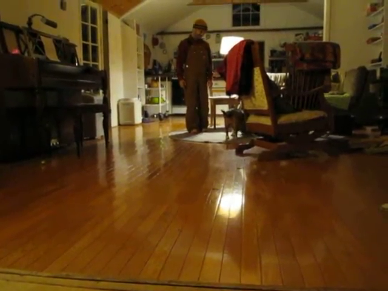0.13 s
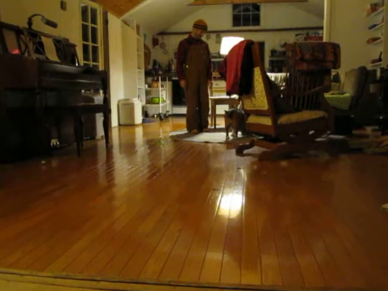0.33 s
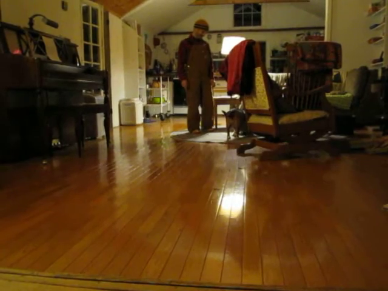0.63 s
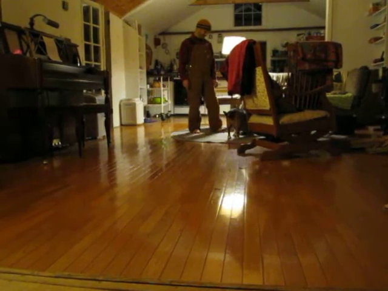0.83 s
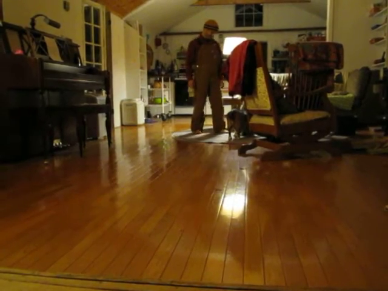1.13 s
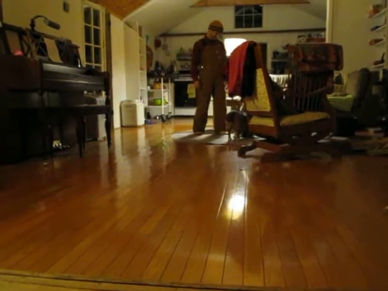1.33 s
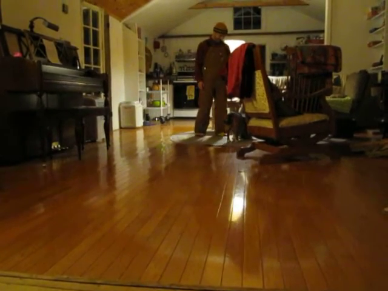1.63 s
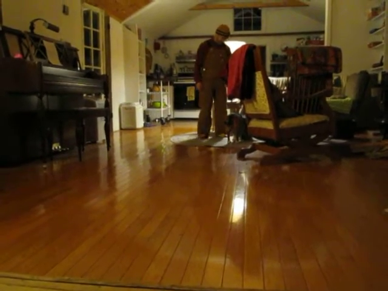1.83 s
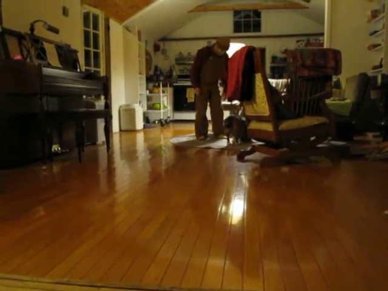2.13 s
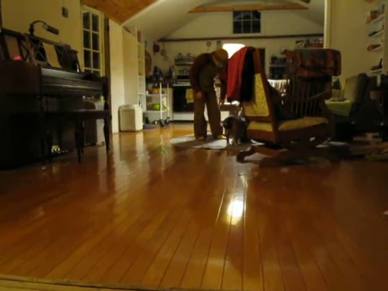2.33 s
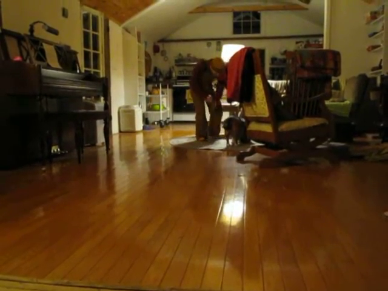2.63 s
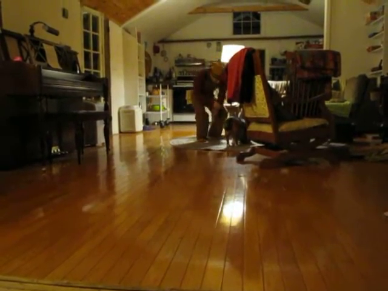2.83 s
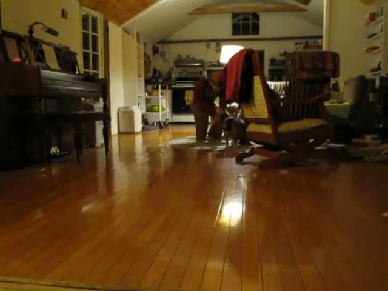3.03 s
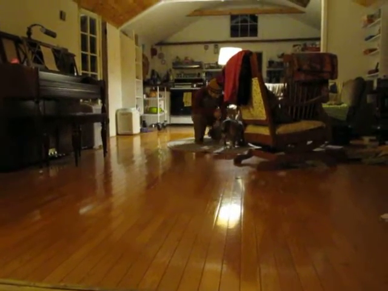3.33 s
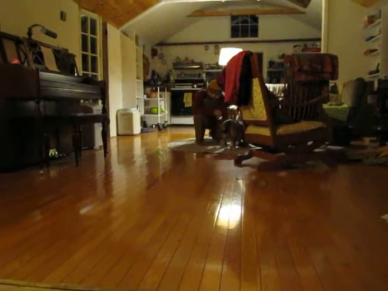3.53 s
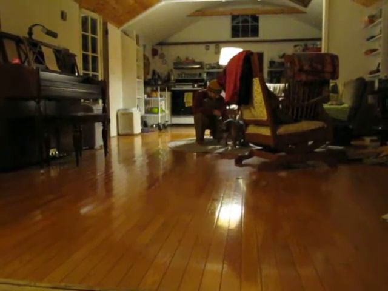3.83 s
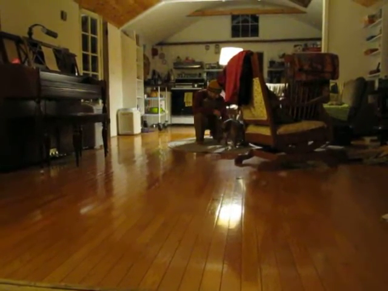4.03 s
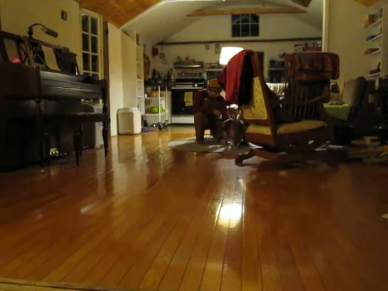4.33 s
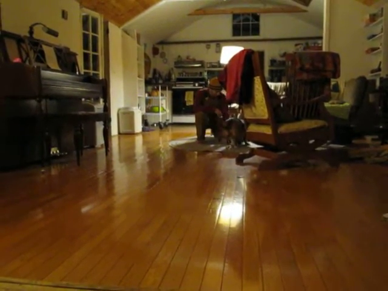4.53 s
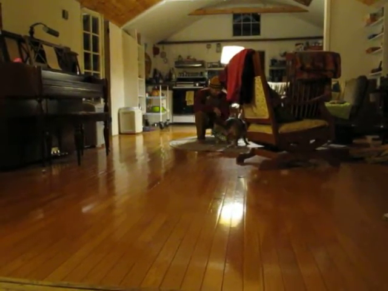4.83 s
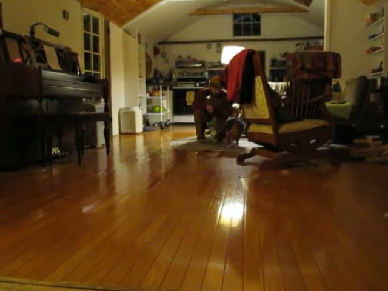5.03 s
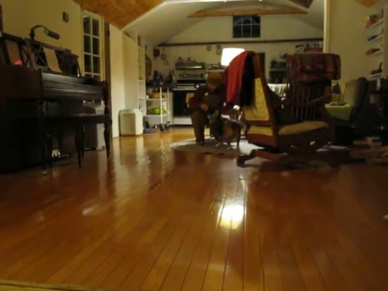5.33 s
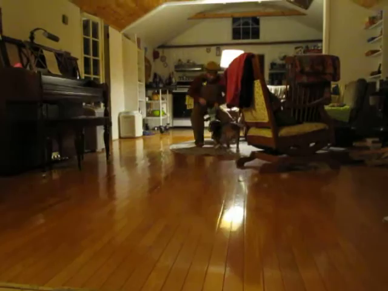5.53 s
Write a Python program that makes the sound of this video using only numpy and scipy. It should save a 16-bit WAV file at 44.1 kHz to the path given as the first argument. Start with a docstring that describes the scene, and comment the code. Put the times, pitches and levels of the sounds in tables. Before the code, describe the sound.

Quick run of sharp toy squeaks with dull thumps across a live room, then rustling cloth and ringing metal dog tags over hiss.

```python
"""A dog chews a squeaky plush toy at the far end of a wood-floored room, over hiss and a faint appliance whine.
After an early clink of metal collar tags, each bite drives air through a reed, which rasps when overblown.
Between bites the bulb refills with a higher squeak; dull thumps, two footfalls and rubbing cloth accompany them.
Later the tags ring more strongly, as damped modes, and a knock sounds the resonances of the floorboards."""
import sys
import numpy as np
from scipy import signal
from scipy.fft import rfft, irfft, next_fast_len
from scipy.io import wavfile
from scipy.ndimage import uniform_filter1d, minimum_filter1d, map_coordinates

SR = 44100
rng = np.random.default_rng(int(sys.argv[2]) if len(sys.argv) > 2 else 0)


def persist_wave(psi):
    """Save psi, clipped to +-1, as 16-bit WAV."""
    counts = np.round(np.clip(psi, -1, 1) * 32767).astype(np.int16)
    wavfile.write(sys.argv[1], SR, np.atleast_2d(counts).T)


N = 250027  # length in samples
TOP_HZ = 15850  # upper band limit


def amp(db):
    """Logarithmic level: decibels to amplitude gain."""
    return 10 ** (np.asarray(db) / 20)


def unit(x):
    """Normalization: scale to rms 1."""
    return x / np.sqrt(np.mean(x ** 2) + 1e-20)


def along(points, hz):
    """Logarithmic frequency scale: interpolate (Hz, value) points on it."""
    point_hz, values = np.transpose(points)
    return np.interp(np.log(hz + 1), np.log(point_hz + 1), values)


def wobble(rate, size):
    """Band-limited fluctuation: a smooth curve through random knots, rate of them a second."""
    knots = rng.standard_normal(int(size * rate / SR) + 4)
    return map_coordinates(knots, [np.arange(size) * rate / SR])


def filtered(x, response):
    """Linear filtering: multiply the spectrum of x by a response of frequency."""
    padded = next_fast_len(len(x) + 8192)
    spectrum = rfft(x, padded) * response(np.fft.rfftfreq(padded, 1 / SR))
    return irfft(spectrum, padded)[:len(x)]


def noise(spectrum, size):
    """Spectral shaping: white noise coloured by (Hz, dB) points, at rms 1."""
    return unit(filtered(rng.standard_normal(size), lambda hz: amp(along(spectrum, hz))))


def add(track, s, sound):
    """Superposition: mix a sound into the track at time s."""
    part = track[round(s * SR):][:len(sound)]
    part += sound[:len(part)]


# Spectrum of the steady hiss. Each row: frequency in Hz, relative level in dB.
HISS_SPECTRUM = [(12, -38), (20, -7), (81, -7), (255, -9.5), (318, -10), (471, -8.5), (573, -9.5),
                 (1090, -6.5), (1400, -7.5), (1800, -6), (2900, -14), (3620, -7), (4410, -16), (11100, -21),
                 (15900, -37)]
# Lines of the appliance motor. Each row: mean frequency in Hz, rms level in dB.
WHINE_LINES = [(1717, -64.5), (1863, -64), (1895, -87), (2439, -67), (3262, -66.5), (3521, -69),
               (3553, -65), (5545, -77.5), (5572, -64), (6406, -68.5)]


def background(hiss_db):
    """Stationary noise plus frequency modulation: hiss under the wavering lines of an appliance motor."""
    whine = np.zeros(N)
    for hz, db in WHINE_LINES:
        phase = 2 * np.pi * np.cumsum(hz + 9 * wobble(70, N)) / SR
        whine += amp(db) * np.sqrt(2) * np.sin(phase)
    return amp(hiss_db) * noise(HISS_SPECTRUM, N) + whine


# Decay of the diffuse tail. Each row: frequency in Hz, t60 in seconds.
ROOM_DECAY = [(150, 0.15), (600, 0.46), (1500, 0.38), (5000, 0.49), (9000, 0.43), (15000, 0.11)]
# Reflections from floor, furniture and walls. Each row: delay in seconds, relative signed strength.
REFLECTIONS = [(.0047, 0.39), (0.0096, -0.82), (0.0187, 0.61), (0.0253, 0.22), (0.0315, -.25),
               (.0383, 0.23), (0.0464, 0.3)]


def room(x, early_db, tail_db):
    """Reverberation as convolution: discrete early reflections and a diffuse tail with frequency-dependent decay."""
    hz, t, cells = signal.stft(rng.standard_normal(SR), SR, nperseg=256)
    decay = amp(-60 * t / along(ROOM_DECAY, hz)[:, None])
    tail = signal.istft(cells * decay, SR, nperseg=256)[1]
    tail = tail * (1 - np.exp(-np.arange(len(tail)) / SR / 0.0076))  # gradual build-up
    response = amp(tail_db) * tail / np.linalg.norm(tail)
    for delay, strength in REFLECTIONS:
        add(response, delay, [amp(early_db) * strength])
    return x + signal.fftconvolve(x, response)[:N]


# Swells of rubbing cloth and plush. Each row: middle in seconds, half width in seconds, relative level in dB.
RUB_SWELLS = [(.4, .25, -71), (1.5, 1, -51.5), (3.2, 0.45, -50), (4.45, 0.62, -55), (4.98, 0.1, -46.5),
              (5.5, 0.39, -49.5)]
# Spectrum of the rubbing. Each row: frequency in Hz, relative level in dB.
CLOTH_SPECTRUM = [(120, -28), (200, -7.5), (236, -11.5), (305, -7.5), (500, -5.5), (600, -6.5), (3480, -5),
                  (11700, -11.5), (15900, -34)]


def rustle():
    """Friction noise: clothes and plush rub in uneven strokes whose powers add as they swell and fade."""
    t = np.arange(N) / SR
    power = sum(amp(db) ** 2 * np.exp(-((t - s) / width) ** 2) for s, width, db in RUB_SWELLS)
    strokes = amp(0.67 * wobble(25, N))
    return np.sqrt(power) * strokes * noise(CLOTH_SPECTRUM, N)


# Collisions of the collar tags. Each row: start in seconds, relative level in dB,
# gain of the 7-9.5 kHz modes in dB, gain of the modes above 12 kHz in dB.
TAG_CLINKS = [(0.3203, -34, -6, 0), (0.4894, -42, 0, 0), (0.5307, -38.5, 6, 0), (4.0911, -40, -2, -2),
              (4.212, -34.5, -2, 4), (4.2696, -39, 5, 0), (4.3023, -35, 6, 0), (4.506, -15.5, -3, 3),
              (4.884, -24, -8, -2), (5.1147, -25, 9, 18), (5.3334, -24, -9, -2), (5.3505, -18, -9, -4),
              (5.3705, -24, -7, -2)]
# Modes of the metal discs. Each row: nominal frequency in Hz, relative level in dB, t60 in seconds.
TAG_MODES = [(2790, -14, .1), (6400, -18, 0.25), (7260, -8.5, 0.13), (8320, 4, 0.076), (8380, -4.5, 0.29),
             (8500, -13, .12), (11320, -2, 0.091), (11300, -0.5, 0.11), (11300, 1, 0.067),
             (12740, -11, 0.083), (13290, -23, .1)]


def tags():
    """Modal synthesis: each collision ticks and shares its energy anew among damped modes of small metal discs."""
    out, t = np.zeros(N), np.arange(SR // 2) / SR
    hz, mode_db, t60 = np.transpose(TAG_MODES)[:, :, None]
    middle, top = (hz > 7000) & (hz < 9500), hz > 12000
    tick_spectrum = [(1500, -28), (5000, -12), (8000, 3), (11500, 2.5), (15500, -18)]  # (Hz, dB)
    for s, db, middle_db, top_db in TAG_CLINKS:
        strength = mode_db + rng.uniform(-2, 2.4, hz.shape) + middle * middle_db + top * top_db
        # the discs lean on each other, which shifts their pitches slightly from blow to blow
        pitch = hz * (1 + 0.0012 * rng.standard_normal(hz.shape))
        modes = amp(strength - 60 * t / t60) * np.sin(2 * np.pi * (pitch * t + rng.random(hz.shape)))
        ring = modes.sum(axis=0) / np.linalg.norm(amp(strength))
        tick = amp(-60 * t / 0.092) * noise(tick_spectrum, len(t))
        onset = 1 - np.exp(-t / 0.00031)
        add(out, s, amp(db - 10.5) * onset * (ring + 0.45 * tick))
    return out


# Knocks on the wooden floor. Each row: start in seconds, relative level in dB.
FLOOR_KNOCKS = [(5.125, -40.5)]
# Resonances of the floorboards. Each row: centre in Hz, width in Hz, relative level in dB.
BOARD_RESONANCES = [(660, 52, -5), (1125, 56, -2.5), (1390, 57, -7), (1890, 90, -15), (2600, 90, -16)]


def boards(hz):
    """Resonance: the floorboards respond as a sum of damped oscillators of alternating sign."""
    response = 0
    for k, (centre, width, db) in enumerate(BOARD_RESONANCES):
        damping = 1j * hz * width
        response = response + (-1) ** k * amp(db) * damping / (centre * centre - hz * hz + damping)
    return response


def knocks():
    """Forced vibration: a short scuffing blow sounds the resonances of the floorboards."""
    out, t = np.zeros(N), np.arange(SR // 4) / SR
    for s, db in FLOOR_KNOCKS:
        envelope = amp(db - 60 * t / 0.21) * (1 - np.exp(-t / 0.00091))
        add(out, s, envelope * unit(filtered(rng.standard_normal(len(t)), boards)))
    return out


def thumps(blows, body):
    """Heavy damping: a padded blow is a short, low puff of noise with no ring."""
    out, t = np.zeros(N), np.arange(SR // 4) / SR
    for s, db, t60 in blows:
        envelope = amp(db - 2.5 - 60 * t / t60) * (1 - np.exp(-t / 0.0019))
        add(out, s, envelope * noise(body, len(t)))
    return out


# Shifts of a foot on the rug. Each row: start in seconds, relative level in dB, t60 in seconds.
FOOT_SHIFTS = [(2.575, -42.5, 0.13), (2.8, -42, 0.11)]
# Spectrum of the footfall. Each row: frequency in Hz, relative level in dB.
FOOT_SPECTRUM = [(50, -25), (150, -12), (260, -5), (400, -4), (620, -5), (900, -12), (2500, -52)]


def footfalls():
    """Damped impact: a foot shifts on the rug."""
    return thumps(FOOT_SHIFTS, FOOT_SPECTRUM)


# Blows of the jaws flattening the bulb. Each row: start in seconds, relative level in dB, t60 in seconds.
JAW_BLOWS = [(1.111, -19.5, 0.067), (1.129, -19, 0.1), (1.456, -29.5, 0.075), (1.567, -22.5, 0.12),
             (1.592, -44, 0.16), (2.066, -26, 0.022), (2.246, -46, 0.059), (2.405, -40.5, 0.12),
             (4.82, -54.5, 0.56)]
# Spectrum of the thump. Each row: frequency in Hz, relative level in dB.
JAW_SPECTRUM = [(50, -59), (130, -26), (260, -13.5), (430, 2.5), (650, 2.5), (900, -3.5), (1300, -50),
                (2500, -70)]


def jaw_thumps():
    """Damped impact: the jaws flatten the bulb with a dull thump."""
    return thumps(JAW_BLOWS, JAW_SPECTRUM)


def reed(strokes, overtones, breeze, jitter, waver, flutter, air, doubling, opening, round_db, round_s, level_db):
    """Self-sustained oscillation: a plastic reed beats in an air stream whose roughness shakes it and adds noise."""
    out = np.zeros(N)
    k = np.arange(1, 15)[:, None]  # harmonic numbers
    for s, t, pitch, db, rough, treble_db in strokes:
        size = len(t)
        rough = np.clip(rough, 0, 1)
        unsteady = jitter * rough * wobble(898.7, size) + waver * wobble(177.5, size)
        phase = 2 * np.pi * np.cumsum(pitch * (1 + unsteady)) / SR
        # the tone starts round until the reed slaps shut; as the flow fades, its overtones fade first
        slap_db = opening * (db - db.max()) - round_db * np.exp(-t / round_s)
        bright_db = slap_db * np.minimum(k - 1, 4) / 4
        # plush and muzzle cover the reed more or less
        cover_db = treble_db * np.minimum(k * pitch / 8000, 1) ** 2
        gains = amp(along(overtones, k * pitch) + bright_db + cover_db) * (k * pitch < TOP_HZ)
        tone = unit(np.sum(gains * np.sin(k * phase), axis=0))
        # alternate beats differ, which puts faint lines between the overtones
        alternation = doubling * rough * wobble(248.2, size) * np.sin(phase / 2)
        tone = tone * (1 + alternation + flutter * rough * wobble(696, size))
        # the reed starts abruptly and dies away more gently
        edges = np.clip(t / 0.0012, 0, 1) * np.clip((t[-1] - t) / 0.0041, 0, 1)
        air_share = air * rough
        mixture = (tone + air_share * noise(breeze, size)) / np.sqrt(1 + air_share ** 2)
        add(out, s, amp(db + level_db) * edges * mixture)
    return out


STALL_HZ, GLIDE_POWER = 1215, 2.1  # the suction dies out at this pitch; glides flatten toward the top
# toward the stall the reed weakens, quickly at first and then more slowly, and turns rough
STALL_DB, STALL_POWER, STALL_ROUGH = 15.5, 0.8, 0.39
# The jaws ease and the bulb sucks air back in, sometimes in two pulls. Each row: start in seconds,
# rise, hold and fall in seconds, first and top mean pitch in Hz, relative level at the top in dB,
# base roughness from 0 to 1, treble gain in dB.
REFILL_PULLS = [ (0.956, .044, 0.0015, .046, 1221, 1922, -24, 0.14, 7),
                (1.33, .06, 0.0067, 0.019, 1283, 1529, -29, 0.08, -2),
                (1.397, .052, 0.0097, 0.012, 1640, 1739, -24.5, 0.02, 2),
                (1.728, 0.013, 0.0013, 0.034, 1345, 1664, -27, 0.3, 5),
                (1.795, 0.04, 0.04, 0.022, 1278, 1734, -24, 0, 1.5),
                (2.211, 0.014, 0.00495, 0.039, 1473, 1670, -28.5, 0.25, 4),
                (2.352, .03, 0.013, 0.017, 1290, 1754, -25, 0.1, 1),
                (2.837, .042, 0.0023, .082, 1689, 1774, -25.5, 0.07, -7.5),
                (2.976, 0.0074, .011, 0.028, 1586, 1715, -30.5, 0.15, -1),
                (3.736, 0.018, 0.0034, 0.049, 1377, 1620, -29, 0.31, -4), ]


def releases():
    """Flow control: suction rises, holds and dies out; pitch, level and steadiness of the reed follow it."""
    for s, rise, hold, fall, first_hz, top_hz, db, rough, treble_db in REFILL_PULLS:
        t = np.arange(0, rise + hold + fall, 1 / SR)
        rising, falling = np.clip([1 - t / rise, (t - rise - hold) / fall], 0, 1) ** GLIDE_POWER
        pitch = top_hz - (top_hz - first_hz) * rising - (top_hz - STALL_HZ) * falling
        slack = np.clip((top_hz - pitch) / (top_hz - STALL_HZ), 0, 1)
        yield s, t, pitch, db - STALL_DB * slack ** STALL_POWER, rough + STALL_ROUGH * slack, treble_db


# Overtones of the inward reed. Each row: frequency in Hz, relative level in dB.
INWARD_OVERTONES = [(1200, 11.5), (1700, -1.5), (2600, -3.5), (3400, -10.5), (4100, -11.5), (4900, -10),
                    (5600, -16.5), (6400, -18.5), (7100, -9.5), (8500, -6.5), (10400, -15.5),
                    (12200, -31.5), (15500, -38)]
# Air sucked through the nozzle. Each row: frequency in Hz, relative level in dB.
INTAKE_SPECTRUM = [(400, -9), (700, -9), (870, 5), (1100, 11), (1500, 15), (2100, -35), (3800, 0.5),
                   (6000, -12.5), (8500, -23), (10300, -6), (12000, -11), (15000, -20)]


def refill():
    """Inward flow: the reed squeaks higher as the bulb draws its air back."""
    return reed(releases(), INWARD_OVERTONES, INTAKE_SPECTRUM,
                jitter=0.056, waver=0.0061, flutter=0.075, air=0.92, doubling=0.34,
                opening=0.18, round_db=8, round_s=0.01, level_db=-0.5)


# the reed breaks loose at once and settles back over the length
OVERBLOW_ATTACK_S, OVERBLOW_POWER = 0.0053, 1.5
# The jaws snap shut and overblow the reed. Each row: start in seconds, length in seconds, and at full force
# the pitch jump in Hz, extra level in dB, extra roughness from 0 to 1.
OVERBLOWN_SNAPS = [(1.109, 0.017, 172.6, 1, 0.35), (1.128, .028, 276.4, -1, .9),
                   (1.57, .047, 432.7, 7, 0.18), (2.064, .04, 400.6, 3.5, 0.94)]


def overblow(t):
    """Overblowing: excess pressure adds pitch, level and roughness to the reed at times t."""
    extra = np.zeros((3, len(t)))
    for s, length, *excess in OVERBLOWN_SNAPS:
        attack = np.clip((t - s) / OVERBLOW_ATTACK_S, 0, 1)
        settling = 1 - np.clip((t - s) / length, 0, 1) ** OVERBLOW_POWER
        extra += np.outer(excess, attack * settling)
    return extra


SCOOP_HZ, SCOOP_S = 73, 0.00598  # the reed starts flat and pulls up to pitch
ATTACK_DB, ATTACK_S = 9, 0.008  # pressure builds as the jaws close
SAG_POWER, SPENT_ROUGH = 2.1, 0.11  # the emptying bulb loses pressure ever faster, and the reed gets rougher
# Bites press air out through the reed. Each row: start in seconds, length in seconds,
# pitch before scoop, sag and overblowing in Hz, sag by the end in Hz, relative level in dB, fade by the end in dB,
# base roughness from 0 to 1, treble gain in dB.
BITE_STROKES = [ (0.768, .1, 1182, 105.8, -18, 7.5, 0.04, 5.5), (1.11, 0.16, 1212, 255, -17, 15.5, 0.11, 0),
                (1.535, .15, 1204, 237.2, -17, 16.5, 0.09, -0.1),
                (2.017, 0.0973, 1201, 29.6, -19.5, 6.5, 0.13, -2.5),
                (2.661, .175, 1174, 75, -21.5, 12, 0.06, -2), ]


def bites():
    """Pressure drive: each bite builds pressure quickly; pitch and level then sag as the bulb empties."""
    for s, length, hz, sag_hz, db, fade_db, rough, treble_db in BITE_STROKES:
        t = np.arange(0, length, 1 / SR)
        spent = (t / length) ** SAG_POWER
        jump_hz, push_db, rasp = overblow(s + t)
        pitch = hz - SCOOP_HZ * np.exp(-t / SCOOP_S) - sag_hz * spent + jump_hz
        level = db - ATTACK_DB * np.exp(-t / ATTACK_S) - fade_db * t / length + push_db
        yield s, t, pitch, level, rough + SPENT_ROUGH * spent + rasp, treble_db


# Overtones of the outward reed. Each row: frequency in Hz, relative level in dB.
OUTWARD_OVERTONES = [(1000, 2), (1250, 3), (1600, -3), (2350, -8), (3500, -7), (4700, -7), (5800, -3.5),
                     (7100, -1), (8200, -4.5), (9400, -9), (10600, -21), (12000, -28.5), (15500, -46)]
# Air rushing past the reed. Each row: frequency in Hz, relative level in dB.
RASP_SPECTRUM = [(400, 0.5), (750, -13), (1200, -5), (1550, 12), (2050, -2), (2800, 11), (4500, 9),
                 (7500, 17), (9300, 5), (11000, -32), (15000, -38)]


def squeeze():
    """Outward flow: each bite squeaks the reed, and rough flow adds a rasp of rushing air."""
    return reed(bites(), OUTWARD_OVERTONES, RASP_SPECTRUM,
                jitter=0.0704, waver=0.0074, flutter=1.0, air=0.71, doubling=0.032,
                opening=0.21, round_db=1, round_s=0.019, level_db=-2.5)


def scene():
    """Superposition: toy, collar and floor sound in the room, above cloth and background."""
    toy_and_floor = squeeze() + refill() + jaw_thumps() + footfalls() + knocks()
    in_room = room(toy_and_floor, early_db=-5.5, tail_db=-3.0)
    collar = room(tags(), early_db=-7.5, tail_db=-4.5)
    return (in_room + collar + rustle() + background(hiss_db=-52.5))[None]


def record(dry):
    """Peak limiting and band limitation: the loudest peaks are held down and the top of the band is cut."""
    x = dry[0]
    needed = np.minimum(1, amp(-9) / (np.abs(x) + 1e-9))
    gain = uniform_filter1d(minimum_filter1d(needed, size=200), size=200)
    return filtered(x * gain, lambda hz: hz < TOP_HZ)[None]


dry = scene()
out = record(dry)
persist_wave(out)
```